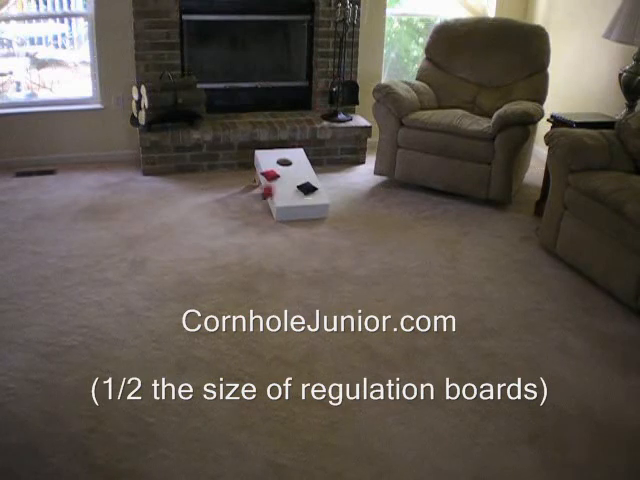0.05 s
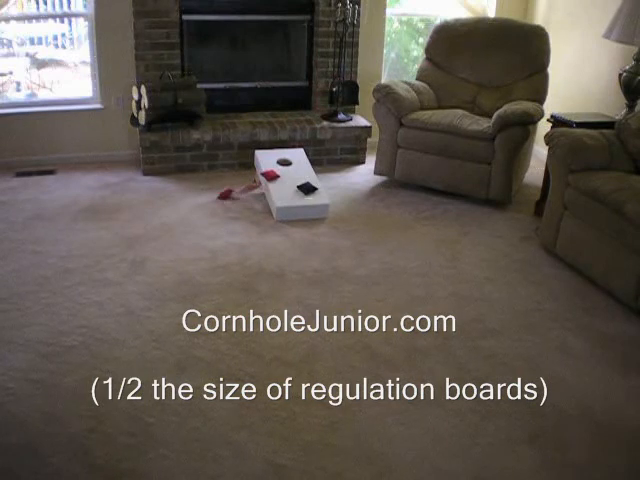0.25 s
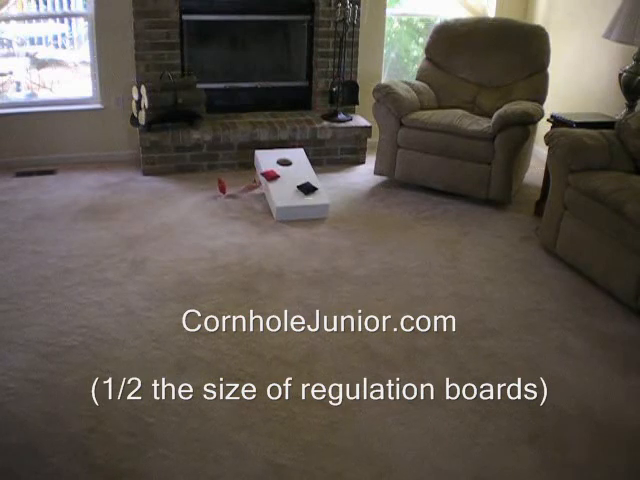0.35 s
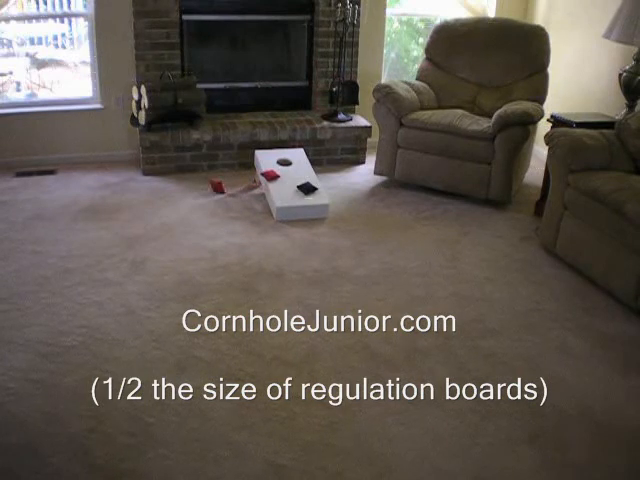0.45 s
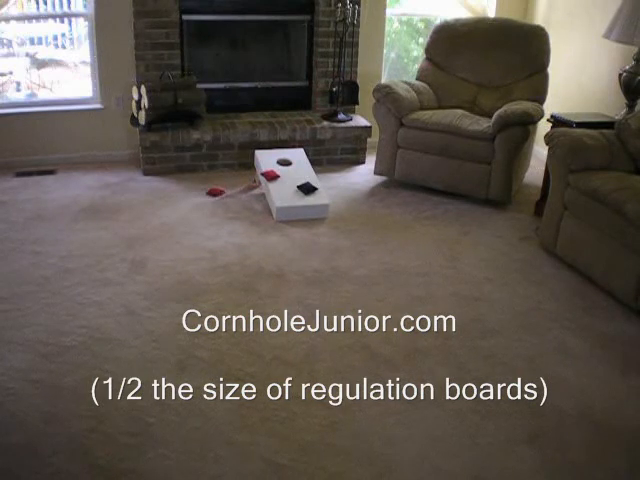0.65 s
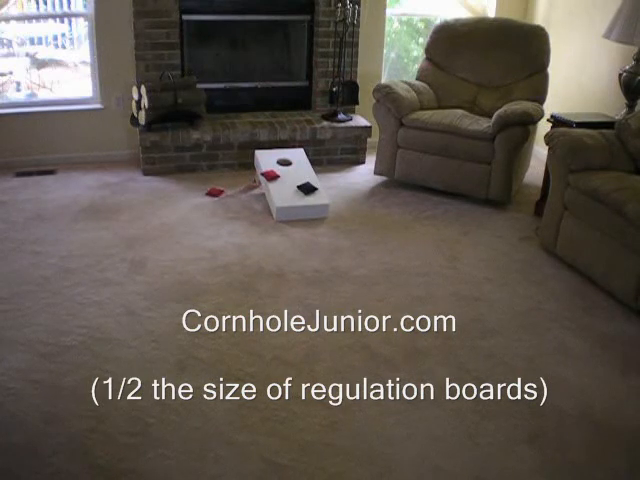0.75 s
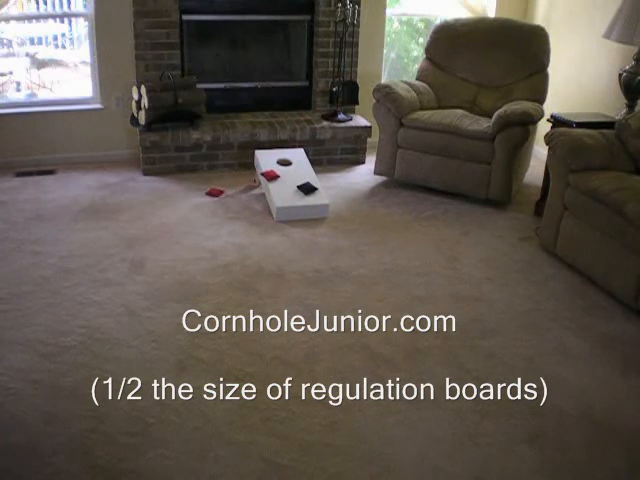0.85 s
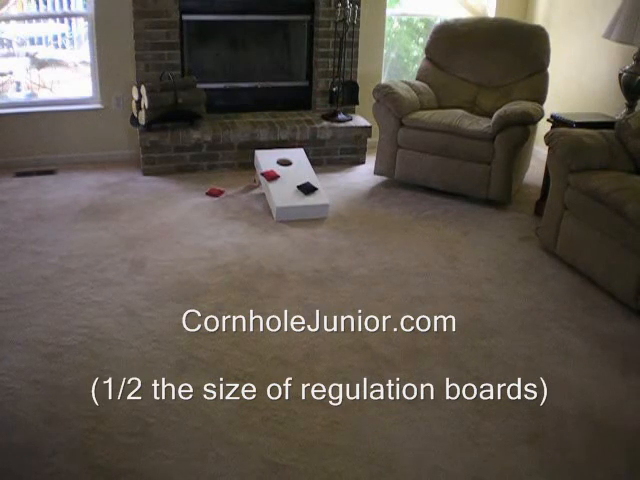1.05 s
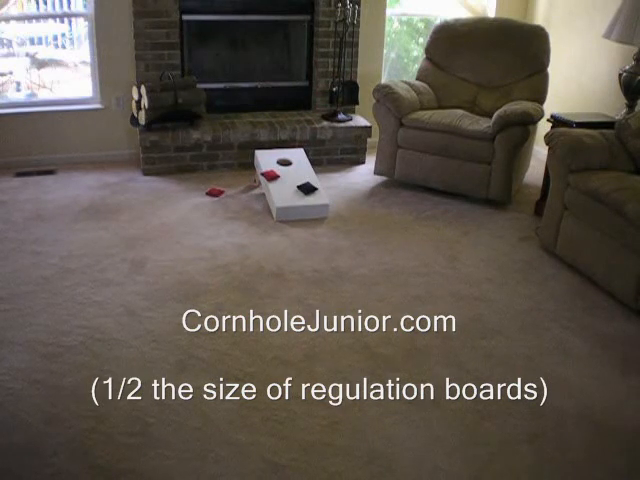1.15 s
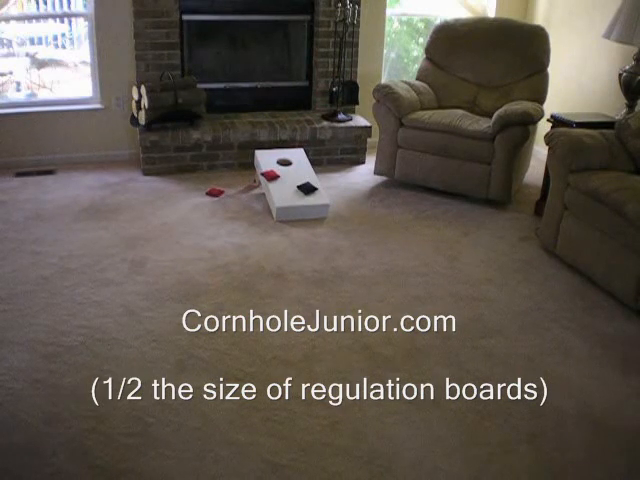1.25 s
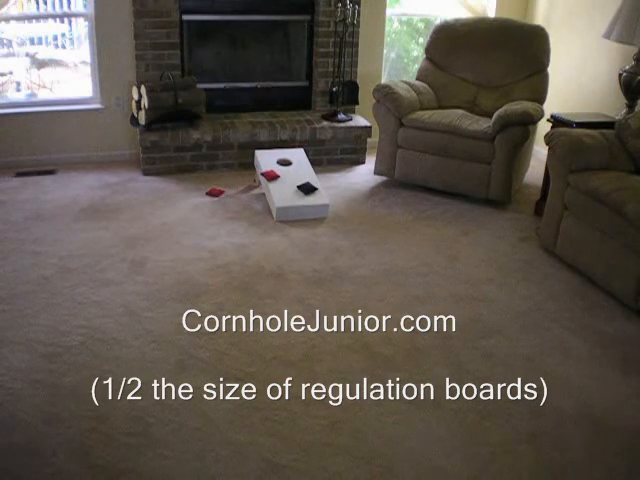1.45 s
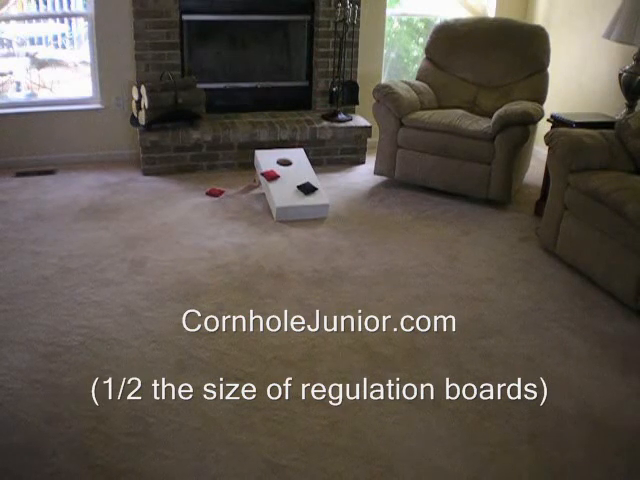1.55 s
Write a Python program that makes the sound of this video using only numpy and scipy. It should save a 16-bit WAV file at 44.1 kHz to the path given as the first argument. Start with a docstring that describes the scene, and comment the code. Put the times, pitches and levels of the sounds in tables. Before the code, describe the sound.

A bean bag slaps onto a small hollow wooden board in a quiet room.

```python
"""Bean bag on a hollow board

A bean bag slaps onto a small hollow wooden board in a living room, slumps and flops down. Its beans
drive the board's resonances and the room rings on. Clothes rustle faintly, once just before the hit
and again afterwards, over a hush and a hollow drone. A pocket camera overloads on the hit and stores
coarse, slow samples, which add a gritty hiss and a metallic treble."""
import sys
import numpy as np
from scipy import signal
from scipy.fft import rfft, irfft, next_fast_len
from scipy.io import wavfile
from scipy.ndimage import map_coordinates

SR = 44100
rng = np.random.default_rng(int(sys.argv[2]) if len(sys.argv) > 2 else 0)


def log_audio(samples):
    """Write samples as a 16-bit WAV file to the path given in sys.argv[1]."""
    # one column per channel
    frames = np.atleast_2d(samples).T
    # limit to full scale, then quantise
    limited = np.clip(frames, -1, 1)
    pcm = np.round(limited * 32767).astype(np.int16)
    wavfile.write(sys.argv[1], SR, pcm)


N = 70560

# tone of the room's hush: f/Hz, relative level/dB
HUSH_SPECTRUM = [(25, -2), (60, -5.5), (150, 1), (280, 0), (410, 1), (600, -5.5), (1200, -4), (2000, -12),
                 (3800, -13)]
# fader curve of the hollow drone: t/s, level/dB
DRONE_LEVELS = [(0, -58), (.7, -52.5), (.95, -63), (1.069, -46.5), (1.2, -58), (1.288, -46.5), (1.47, -48),
                (1.6, -51.5)]
# swells of moving clothes: centre t/s, half width/s, level/dB, treble tilt/(dB per octave)
RUSTLE_SWELLS = [(0.153, 0.046, -52, 1.5), (0.846, 0.018, -48.5, 3.5), (1.092, 0.032, -40.5, 1.5),
                 (1.312, 0.035, -49.5, -2), (1.454, 0.054, -44, -1), (1.61, 0.049, -42, 1)]
# tone of the clothes before the tilt: f/Hz, relative level/dB
CLOTH_SPECTRUM = [(100, -10), (400, -5), (1000, 2.5), (2000, -7), (3800, -4.5)]
# blows of the bag on the board: t/s, relative level/dB, settling time of the filling/s
BAG_BLOWS = [(0.1972, -14, 0.011), (0.1987, 0.5, 0.034), (0.2227, 0.5, .014), (0.2555, -5, 0.022),
             (0.294, -7.5, 0.0082)]
# resonances of the hollow board: f/Hz, relative level/dB, bandwidth/Hz
BOARD_MODES = [(254, -9.5, 39), (312.3, 0, 13), (491, -1, 7.4), (730, -12, 54), (807, 1.5, 33),
               (900, -3, 24), (1183, -4.5, 40), (1252, -0.5, 40), (1365.4, 9.5, 59), (1467, 0.5, 15),
               (1484, -7, 99), (2081, 2.5, 39), (2163, 6, 34), (2562, 2, 100), (3084, 4, 38),
               (3297, 3.5, 49), (3490, -6, 60)]
# tone of the slap of cloth and filling: f/Hz, relative level/dB
SLAP_SPECTRUM = [(30, -23), (100, -29), (250, -13.5), (600, -7.5), (1000, -8), (1650, -6), (2000, 1.5),
                 (2350, -7.5), (2800, -2.5), (3900, -1)]
# tone of the bright crack of cloth on wood: f/Hz, relative level/dB
CRACK_SPECTRUM = [(100, -37), (900, -20), (1800, 2), (2650, -5), (3900, -29)]
# soft landings as the bag slumps: t/s, level/dB
THUD_HITS = [(0.221, -19), (0.244, -22.5), (.292, -35), (0.387, -28.5), (0.409, -30.5)]
# tone of those dull landings: f/Hz, relative level/dB
THUD_SPECTRUM = [(30, -26), (90, -25), (230, -1), (320, -3), (450, -15), (2000, -49)]

ATTACK_S = 0.00036  # rise of each blow and of the crack
CAMERA_RATE_HZ = 8000


def amp(db):
    """Decibels to gain."""
    return 10 ** (np.asarray(db) / 20)


def unit_rms(x):
    """The signal scaled to rms 1."""
    return x / np.sqrt(np.mean(x ** 2) + 1e-20)


def since(start):
    """Seconds since a moment, zero before it."""
    return np.maximum(np.arange(N) / SR - start, 0)


def strike(start, rise_s, fall_s):
    """A percussive envelope: quick attack, exponential decay."""
    t = since(start)
    return (1 - np.exp(-t / rise_s)) * np.exp(-t / fall_s)


def filtered(x, response):
    """The signal through an EQ given as gain against frequency."""
    size = next_fast_len(N + SR // 2)
    return irfft(rfft(x, size) * response(np.fft.rfftfreq(size, 1 / SR)), size)[:N]


def resonance(f, hz, width):
    """Frequency response of one damped resonance."""
    return 1j * f * width / (hz * hz - f * f + 1j * f * width)


def noise(spectrum):
    """Noise of rms 1, coloured by (f/Hz, level/dB) points and cut at half the camera's sample rate."""
    hz, db = np.transpose(spectrum)

    def colour(f):
        return amp(np.interp(np.log(f + 1), np.log(hz + 1), db)) * (f < CAMERA_RATE_HZ / 2)
    return unit_rms(filtered(rng.standard_normal(N), colour))


def room_tone():
    """The bed: a steady hush and a faint hollow drone that comes and goes."""
    drone = unit_rms(filtered(rng.standard_normal(N), lambda f: resonance(f, hz=419.7, width=95)))
    drone_db = np.interp(since(0), *np.transpose(DRONE_LEVELS))
    return amp(-45.5) * noise(HUSH_SPECTRUM) + amp(drone_db) * drone


def clothes_rustle():
    """Moving cloth makes soft swells of noise, some brighter, some duller."""
    rustle = np.zeros(N)
    for centre, half_width, level, tilt in RUSTLE_SWELLS:
        swell = np.exp(-0.5 * ((since(0) - centre) / half_width) ** 2)
        cloth = noise([(hz, db + tilt * np.log2(hz)) for hz, db in CLOTH_SPECTRUM])
        rustle += amp(level) * swell * cloth
    return rustle


def with_room_tail(envelope, t60_s=0.64, predelay_s=0.002, build_s=0.0018, wet_db=-2):
    """An envelope plus the room's diffuse echoes, whose energy builds up and dies away."""
    t = since(predelay_s)
    echo_power = (amp(-60 * t / t60_s) * (1 - np.exp(-t / build_s))) ** 2
    tail_power = np.abs(signal.fftconvolve(envelope ** 2, echo_power / echo_power.sum())[:N])
    return np.sqrt(envelope ** 2 + amp(wet_db) ** 2 * tail_power)


def board_response(f):
    """The woody body: the board's resonances summed, at unit mean power."""
    body = sum(amp(db) * resonance(f, hz, width) for hz, db, width in BOARD_MODES)
    return body / np.sqrt(np.mean(np.abs(body) ** 2))


def bag_on_board():
    """Each blow is a dense shower of beans: it slaps, drives the board and fills the room."""
    force = sum(amp(db) * strike(start, ATTACK_S, settle) for start, db, settle in BAG_BLOWS)
    envelope = with_room_tail(force)
    knock = filtered(envelope * rng.standard_normal(N), board_response)
    slap = envelope * noise(SLAP_SPECTRUM)
    return amp(-7) * knock + amp(-9) * slap


def cloth_crack():
    """The bright edge: cloth smacks bare wood on the second blow, as the bag's full weight lands."""
    start = BAG_BLOWS[1][0]
    return amp(-15) * strike(start, ATTACK_S, fall_s=0.041) * noise(CRACK_SPECTRUM)


def bag_thuds():
    """The low end: the bag's weight flops down in dull pushes."""
    pushes = sum(amp(db) * strike(start, rise_s=0.006, fall_s=0.02) for start, db in THUD_HITS)
    return pushes * noise(THUD_SPECTRUM)


def scene():
    """The mono mix: the layers of the hit over rustling clothes and room tone."""
    return (bag_on_board() + cloth_crack() + bag_thuds() + clothes_rustle() + room_tone())[None]


def record(dry):
    """The camera's lo-fi colour: clipping crunches, coarse steps hiss, held samples sound metallic."""
    input_cutoff_hz, output_cutoff_hz = 3870, 15780
    steps = 128  # from zero to full scale
    dulled = filtered(dry[0], lambda f: 1 / np.sqrt(1 + (f / input_cutoff_hz) ** 20))
    hold_positions = np.floor(np.arange(N) * CAMERA_RATE_HZ / SR) * SR / CAMERA_RATE_HZ
    held = map_coordinates(dulled, [hold_positions], mode="nearest")
    clipped = np.clip(held, -1, 1)
    crushed = np.floor(clipped * steps) / steps
    return filtered(crushed, lambda f: f < output_cutoff_hz)[None]


dry = scene()
out = record(dry)
log_audio(out)
```